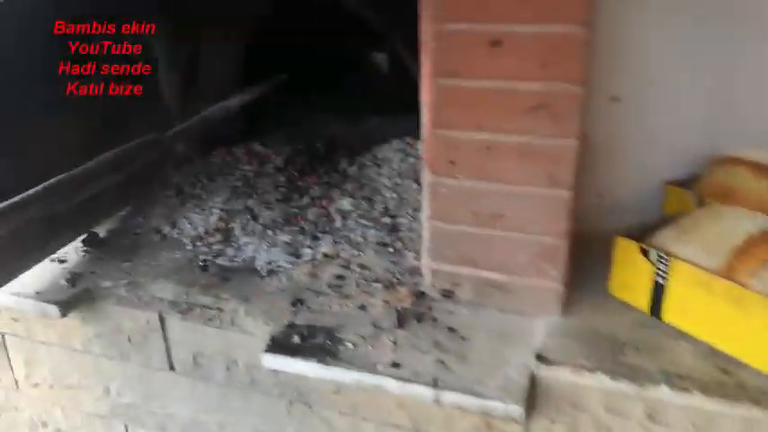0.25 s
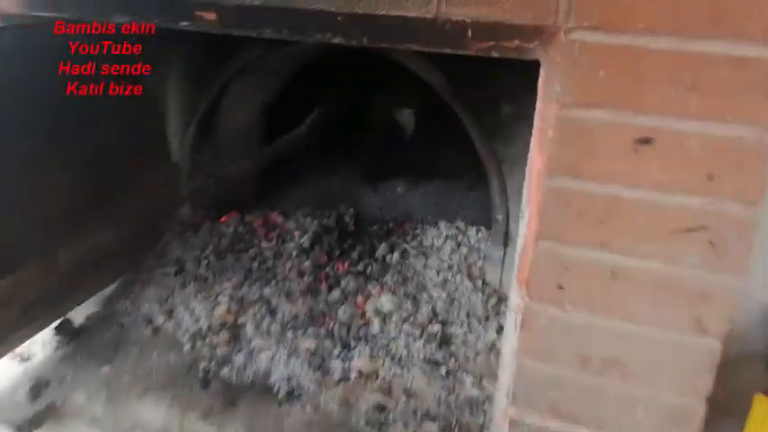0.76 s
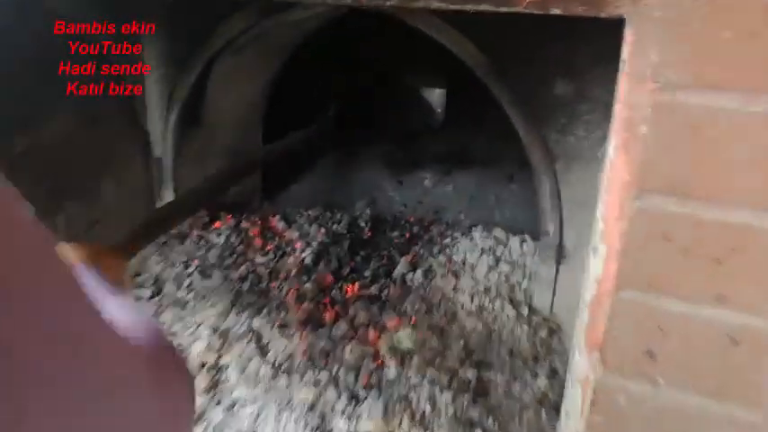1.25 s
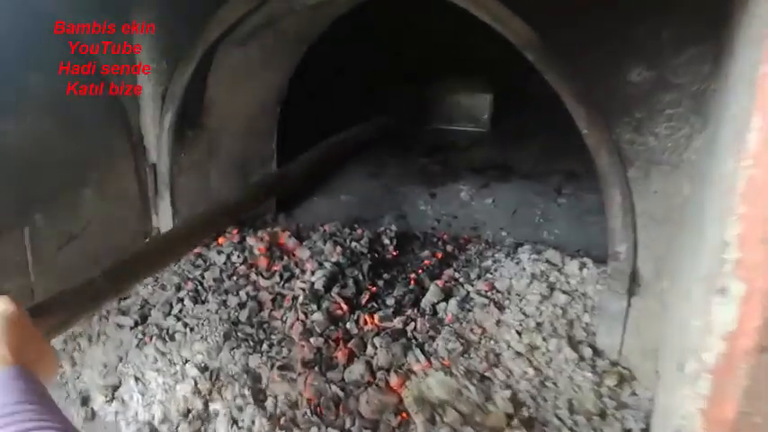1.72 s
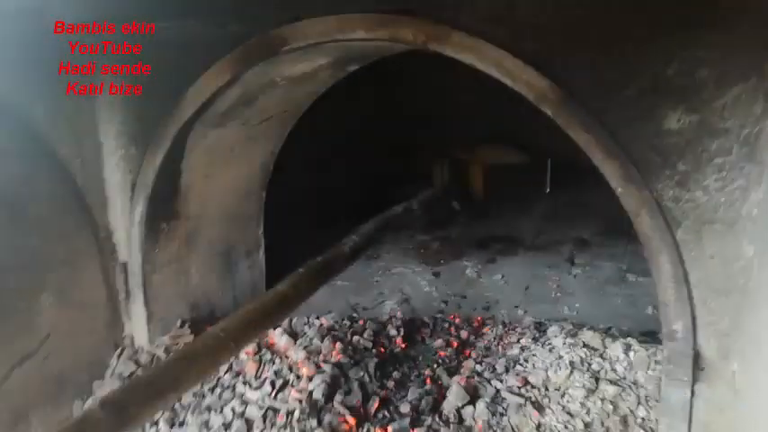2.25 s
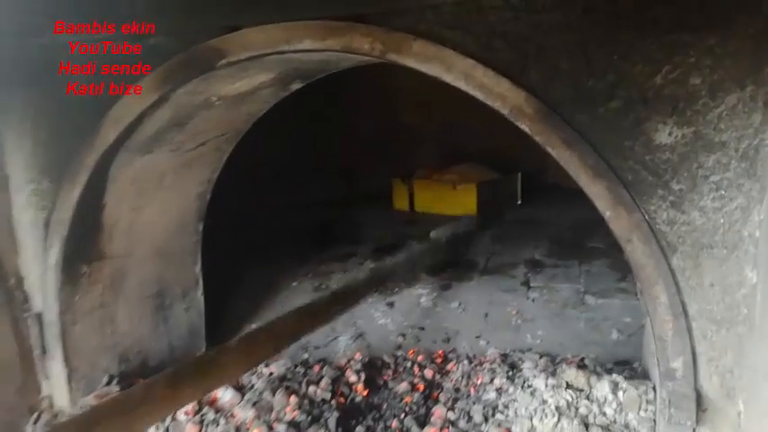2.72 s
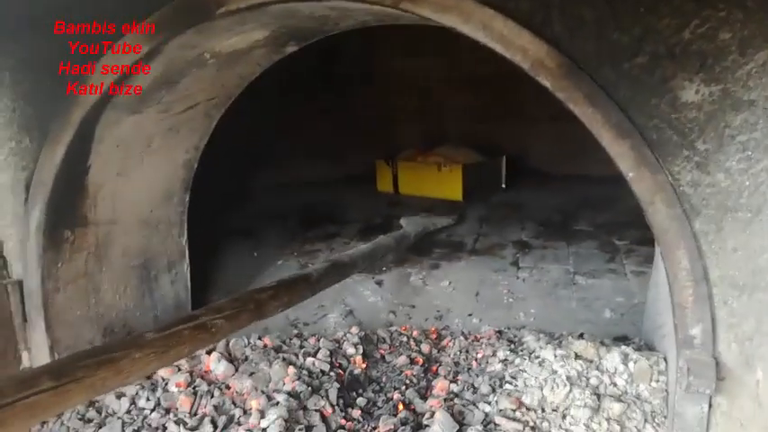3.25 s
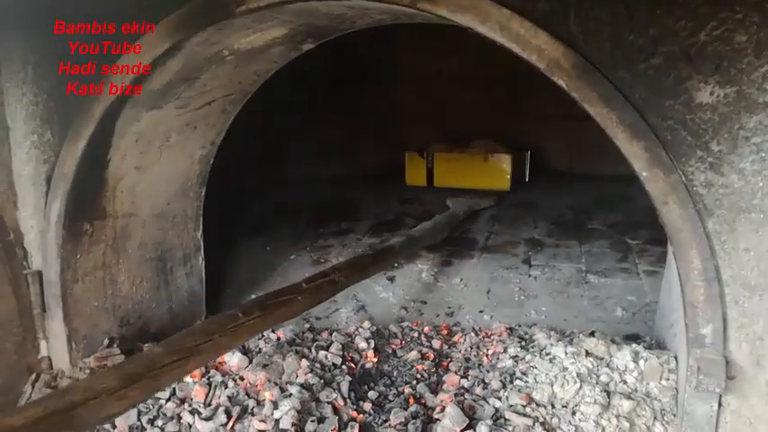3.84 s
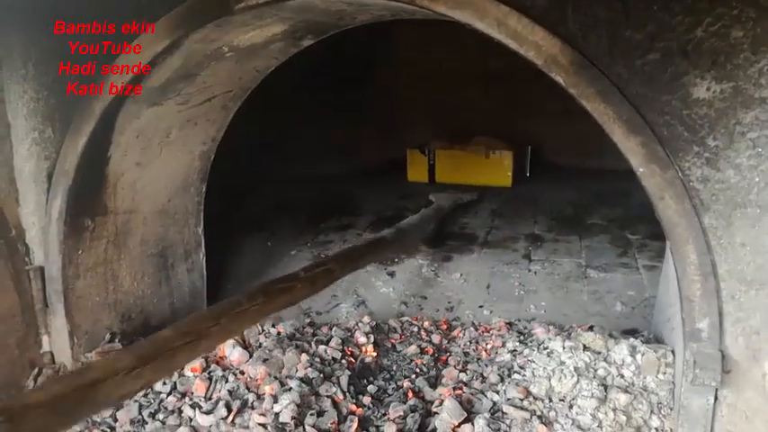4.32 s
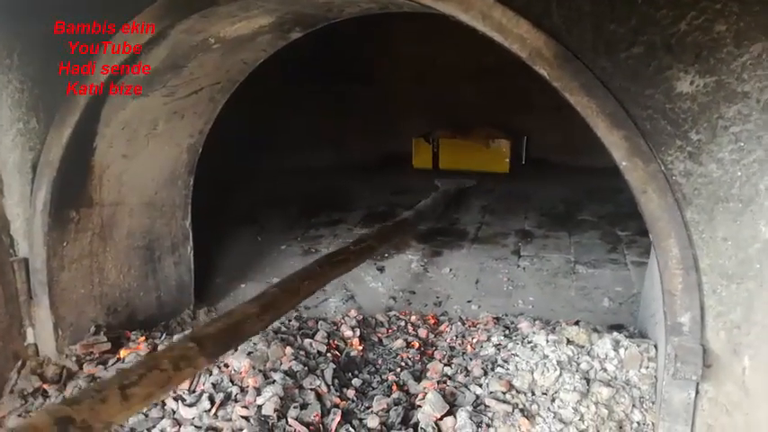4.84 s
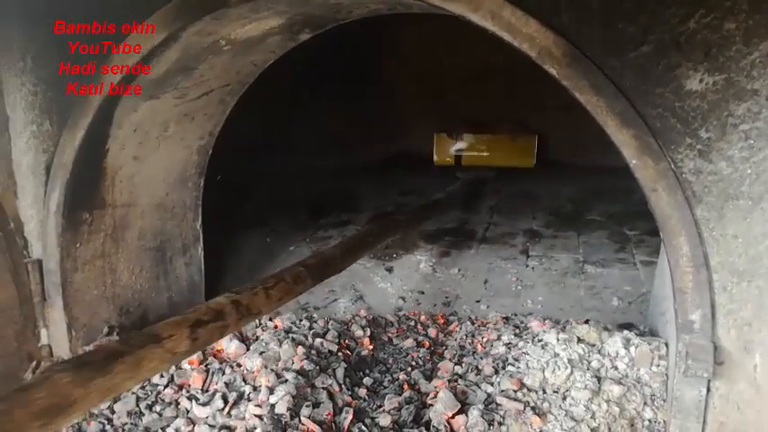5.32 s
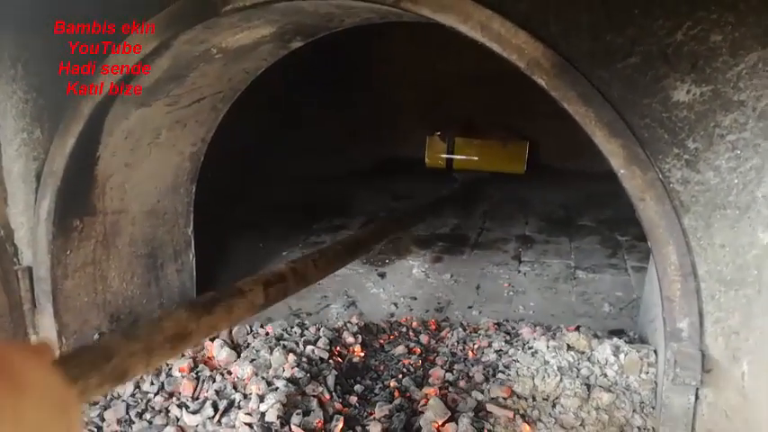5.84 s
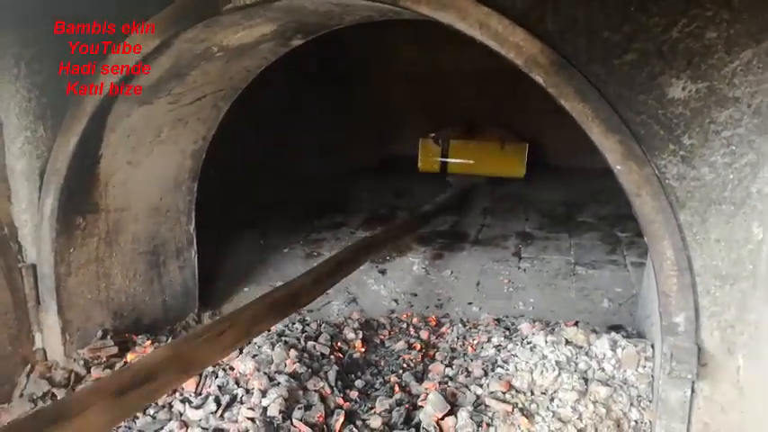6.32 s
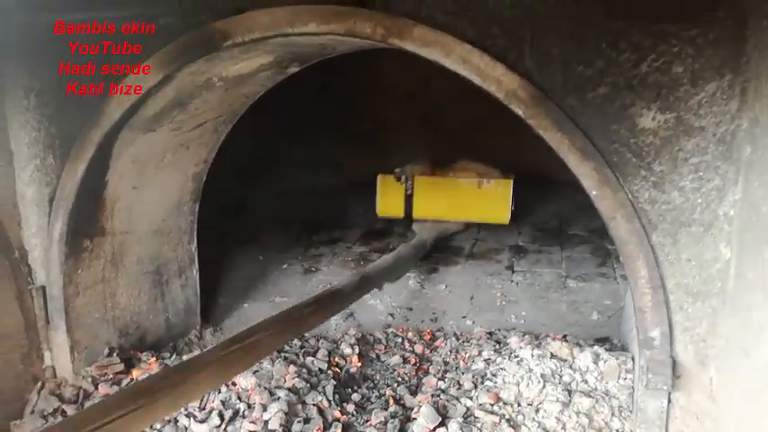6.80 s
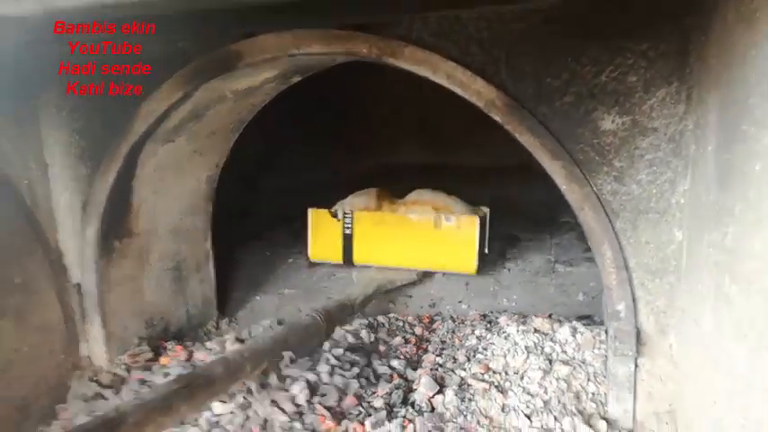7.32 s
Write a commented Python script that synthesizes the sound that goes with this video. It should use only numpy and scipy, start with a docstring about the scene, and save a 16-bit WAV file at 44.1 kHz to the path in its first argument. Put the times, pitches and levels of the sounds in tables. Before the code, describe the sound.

A metal baking tin catches and slips on an ashy oven floor, nudged by a long wooden pole. Sparse knocks lean left, then a hard metallic bang shakes the hearth, followed by busy knocking and grinding nearer the centre. A snapping ember bursts close to the left microphone late on. Short brick-vault echo, faint fire rumble and quiet outdoor air lie underneath.

```python
"""A long wooden peel drags and knocks a metal baking tin over the gritty floor of a brick oven, in stereo.
Scrape and knock forces, made of grainy noise, shake six bodies: handle, blade, the tin's base, rim and
walls, and loose grit. The brick vault answers the knocks briefly. One ember pops beside the left
microphone and a coal ticks, both shaped pulses. Behind lie filtered noises: the hush of a still yard,
the low rumble of the fire drawing air, and a hearth shudder after each knock."""
import sys
import numpy as np
from scipy import signal
from scipy.fft import rfft, irfft, next_fast_len
from scipy.io import wavfile
from scipy.ndimage import uniform_filter1d, map_coordinates

SR = 44100
rng = np.random.default_rng(int(sys.argv[2]) if len(sys.argv) > 2 else 0)


def digitize_waveform(pressure):
    """Quantize a signal to 16-bit integers and store it at the path in sys.argv[1].

    Rows of a 2-D input are taken as channels; values are limited to [-1, 1].
    """
    field = np.atleast_2d(pressure).T
    bounded = np.clip(field, -1, 1)
    quanta = np.round(bounded * 32767).astype(np.int16)
    wavfile.write(sys.argv[1], SR, quanta)


N = 333837  # samples


def amp(db):
    """Amplitude factor of a level in dB."""
    return 10 ** (np.asarray(db) / 20)


def unit(x):
    """x scaled to rms 1."""
    return x / np.sqrt(np.mean(x ** 2) + 1e-20)


def along(points, hz):
    """(frequency [Hz], value) points joined by straight lines on a log frequency axis."""
    f, v = np.transpose(points)
    return np.interp(np.log(hz + 1), np.log(f + 1), v)


def curves(rows):
    """One value per sample for each column after the time [s]."""
    s, *columns = np.transpose(rows)
    return np.array([np.interp(np.arange(N) / SR, s, column) for column in columns])


def wobble(rate):
    """A smooth random curve with rate knots a second."""
    knots = rng.standard_normal(int(N * rate / SR) + 4)
    return map_coordinates(knots, [np.arange(N) * rate / SR])


def filtered(x, response):
    """x times a complex response of frequency, padded so that ringing does not wrap round."""
    m = next_fast_len(N + SR // 2)
    return irfft(rfft(x, m) * response(np.fft.rfftfreq(m, 1 / SR)), m)[..., :N]


HUSH_DB = -65  # rms, before it reaches the microphone ports
# spectrum of the still yard: (frequency [Hz], relative level per Hz [dB])
YARD_SPECTRUM = [(12, -27), (20, 7), (59, -1.5), (86, -22.5), (98, -3), (118, -5), (224, -30), (390, -19.5),
                 (422, -14), (495, -30.5), (2930, -23), (7220, -39), (11300, -100), (14700, -90),
                 (22000, -120)]


def yard_hush():
    """Steady outdoor hush: noise shaped like the air of the still yard."""
    noise = rng.standard_normal((2, N))
    return amp(HUSH_DB) * unit(filtered(noise, lambda hz: amp(along(YARD_SPECTRUM, hz))))


# a knock shakes the hearth: level, growth per dB of the handle's level, time to fall 60 dB [s]
THUMP_DB, THUMP_PER_DB, THUMP_T60 = -30, 0.55, 0.4


def hearth_shudder():
    """Level of the low shudder: each knock starts one that dies exponentially."""
    since = np.arange(N) / SR - np.array(KNOCKS)[:, :1]
    start_db = [[THUMP_DB + THUMP_PER_DB * (db + handle)] for s, db, handle, *_ in KNOCKS]
    return np.sum((since > 0) * amp(start_db - 60 * abs(since) / THUMP_T60), axis=0)


# the fire's draw of air: (time [s], level [dB])
DRAUGHT = [(0.0, -66), (0.93, -74), (1.12, -66.5), (2.72, -61), (3.03, -67), (4.17, -56.5), (4.43, -57),
           (5.52, -57), (6.13, -67), (6.85, -59), (7.25, -66), (7.42, -77.5), (7.57, -76)]
# spectrum of draught and shudder: (frequency [Hz], relative level per Hz [dB])
RUMBLE_SPECTRUM = [(12, -11.5), (25, -3), (40, 0.5), (54, 6), (70, -12.5), (100, -23.5), (200, -120)]


def fire_and_hearth():
    """One low noise carries both the wavering draught of the fire and the hearth's shudder."""
    noise = rng.standard_normal((2, N))
    rumble = unit(filtered(noise, lambda hz: amp(along(RUMBLE_SPECTRUM, hz))))
    draught_level = amp(curves(DRAUGHT)[0]) * unit(amp(2.2 * wobble(11.0)))
    return (draught_level + hearth_shudder()) * rumble


POP_S = 6.4737


def ember_pop():
    """A steam pocket bursts in a coal: push, then slower suction; the far microphone hears it late and dull."""
    t = np.arange(SR // 50) / SR
    onset = 1 - np.exp(-(t / 0.00005) ** 2)
    swing = np.sin(np.pi * (t / 0.0007) ** 0.81) * onset
    near = np.zeros(N)
    near[round(POP_S * SR):][:len(t)] = 7.9 * swing * np.exp(-t / 0.00066)

    def to_far_microphone(hz):
        delay = np.exp(-2j * np.pi * hz * 0.00065)
        return 0.36 * delay / (1 + 1j * hz / 1300) ** 2

    def open_source(hz):
        # a small open source radiates no steady pressure
        return (1j * hz / (170 + 1j * hz)) ** 2

    far = filtered(near, to_far_microphone)
    return filtered(np.array([near, far]), open_source)


# a coal ticks: (time [s], level before the left-right tilt [dB], frequency [Hz])
TICKS = [(.7195, -36, 2000)]


def coal_tick():
    """A tiny tone pulse in a bell-shaped envelope, 5 dB stronger in the left microphone."""
    t = np.arange(SR // 50) / SR
    envelope = np.exp(-((t - 0.0011) / 0.00082) ** 2)
    tick = np.zeros(N)
    for s, db, hz in TICKS:
        tick[round(s * SR):][:len(t)] = amp(db) * np.sin(2 * np.pi * hz * t) * envelope
    return tick * amp([[2.5], [-2.5]])


# the vault's decay: (frequency [Hz], time to fall 60 dB [s])
VAULT = [(150, 0.28), (1000, 0.14), (4000, 0.11), (10000, 0.089)]


def vault(x):
    """The brick vault's answer: a noise tail in which each frequency dies at its own speed."""
    hz, t, z = signal.stft(rng.standard_normal((2, SR // 3)), SR, nperseg=256)
    decay = amp(-60 * t / along(VAULT, hz)[:, None])
    tail = signal.istft(z * decay, SR, nperseg=256)[1]
    return signal.fftconvolve(x, tail / np.linalg.norm(tail[0]), axes=1)[:, :N]


# likeness of the two ports before the bass is drawn together: (frequency [Hz], correlation)
ALIKE = [(100, .9995), (330, 0.49), (480, 0.59), (1000, 0.083), (2000, 0.067), (4000, 0.23), (9000, 0.043)]
# left behind right: (frequency [Hz], phase [radians])
LAG = [(0, -9), (350, 1.26), (600, 3.5), (1150, 6.5), (11000, 39)]
# left over right: (frequency [Hz], level [dB])
SHADE = [(350, 0), (650, -7.5), (1100, -3), (2000, -1), (3800, -7), (6000, -10.5), (11000, -9)]


def ports(pair):
    """Two unrelated sounds become left and right: alike in the bass, the left late and shaded by the hand."""
    side = np.array([[0.5], [-0.5]])

    def mix(hz):
        angle = np.arccos(along(ALIKE, hz)) / 2
        return np.array([np.cos(angle), np.sin(angle)])

    def lag_and_shade(hz):
        lag = np.interp(hz, *np.transpose(LAG))
        return np.exp(-1j * side * lag) * amp(side * along(SHADE, hz))

    common, apart = filtered(pair, mix)
    left, right = filtered(np.array([common + apart, common - apart]), lag_and_shade)
    # long waves press on both ports together
    bass_gap = filtered((left - right) / 2, lambda hz: 0.9 / (1 + (hz / 370) ** 8))
    return np.array([left - bass_gap, right + bass_gap])


def placed(stereo, pan_db):
    """A left-right tilt that spares the bass, which reaches both microphones alike."""
    bass = filtered(stereo, lambda hz: 1 / (1 + (hz / 420) ** 6))
    return bass + (stereo - bass) * amp(pan_db * [[0.5], [-0.5]])


def modes(table):
    """Causal response of a set of resonances of alternating sign, with its skirts steepened."""
    low, high = table[0][0] * 0.63, table[-1][0] * 2.1

    def response(f):
        ring = 0
        for k, (centre, width, db) in enumerate(table):
            resonance = 1j * f * width / (centre * centre - f * f + 1j * f * width)
            ring = ring + (-1) ** k * amp(db) * resonance
        skirts = (1j * f / (low + 1j * f) * high / (high + 1j * f)) ** 2
        return ring * skirts

    return response


BODIES = 6  # always in the order handle, blade, base, rim, walls, grit
# resonances of the peel's handle and blade: (frequency [Hz], width [Hz], relative level [dB])
HANDLE = [(91, 29, -8), (107, 15, -1.5), (157, 66, 1.5)]
BLADE = [(204.7, 36, 6), (277, 30, -4), (311, 31, -0.5), (382, 100, -9.5)]
# resonances of the tin's base, rim and walls: (frequency [Hz], width [Hz], relative level [dB])
BASE = [(474, 220, 2), (656, 65, 4), (758, 147, 1.5), (832, 76, -1.5)]
RIM = [(920, 150, -1.5), (1090, 84, 4.5), (1233, 45, 2), (1303, 22, 3), (1455, 370, -3)]
WALLS = [(1650, 130, -2.5), (1890, 130, 1.5), (2050, 55, 6.5), (2235, 98, 0.5), (2460, 110, -0.5),
         (2726, 190, 2), (2837, 306, 0.5), (3003, 99, 0), (3224, 39, -6), (3465, 77, -5.5),
         (3726, 97, -5.5), (4203, 340, -12)]
# spectrum of the loose grit: (frequency [Hz], relative level per Hz [dB])
GRIT = [(2060, -35), (3500, -9.5), (4430, -10.5), (5690, -9.5), (9040, -20.5), (9780, -23), (11100, -27.5),
        (11300, -50), (14700, -65), (22000, -120)]


def bodies(forces):
    """Six forces ring the six bodies; white force of rms 1 gives each body a sound of rms 1."""
    grid = np.linspace(0, SR / 2, num=20000)
    responses = [modes(table) for table in (HANDLE, BLADE, BASE, RIM, WALLS)]
    responses.append(lambda f: amp(along(GRIT, f)))
    total = 0
    for force, response in zip(forces, responses):
        gain = np.sqrt(np.mean(abs(response(grid)) ** 2))
        total = total + filtered(force, response) / gain
    return total


def gritty(spread_db):
    """Pairs of force noise whose samples vary in size like grains of ash and coal."""
    size = amp(spread_db * np.minimum(rng.exponential(size=N), 6))
    return unit(size * rng.standard_normal((BODIES, 2, N)))


RISE_S = 0.00041
# base level of a knock: dull woody knocks sound the base [dB, dB per dB of blade, dB per dB of grit]
BASE_DB, BASE_PER_WOOD, BASE_PER_GRIT = -20, 0.8, -0.58
# walls: a blow on the rim misses them [dB, dB per dB of rim, dB per dB of grit]
WALLS_DB, WALLS_PER_RIM, WALLS_PER_GRIT = -10.5, -0.4, 0.28
# the knocks: (time [s], reference level [dB], then over that level: handle [dB], blade [dB], grit [dB],
# rim [dB]; time for the rattle to fall 60 dB [s])
KNOCKS = [(0.215, -49.5, -30, -23, -6.5, -10, 0.33), (0.279, -29, -51, -39, -12.5, -17, 0.17),
          (0.34, -37, -25.5, -22, -14, -5, 0.039), (0.762, -50, -29, -12, -8.5, -13.5, 0.15),
          (0.978, -37.5, -32, -18, -23, -9, 0.2), (1.042, -26.5, -45, -17.5, -29.5, -13.5, 0.13),
          (1.199, -40.5, -24, -31, -13, -21, 0.11), (1.309, -35, -19, -13.5, -37.5, -17, 0.24),
          (1.545, -46, -24, -19, -27, -4, 0.32), (1.577, -23.5, -29, -19, -28.5, -8.5, 0.11),
          (1.627, -33, -16, -16, -24.5, -7.5, 0.12), (2.248, -37.5, -19, -15, -24, -3, 0.074),
          (2.395, -37.5, -20, -15, -29, -7.5, 0.11), (2.713, -5, -26.5, -31.5, -25, -16.5, 0.094),
          (2.783, -16, -32, -24.5, -19, -16, 0.045), (3.015, -40, -5.5, -29, -24, -15.5, 0.065),
          (3.334, -26.5, -19.5, -6, -24.5, -6.5, 0.12), (3.449, -39, -9, -12, -43.5, 2, 0.047),
          (3.904, -28, -10, -10.5, -24.5, -8, 0.082), (4.196, -28.5, -9.5, -14, -22.5, -9.5, 0.2),
          (4.356, -36.5, -29, -28, -21, -13, 0.097), (4.406, -29, -26, -33, -22, -9.5, 0.082),
          (4.529, -29, -26, -21, -17, -14.5, 0.31), (4.611, -37.5, -20, -9, -48.5, -1.5, 0.037),
          (4.748, -37, -31, -15, -18.5, -6, 0.15), (4.811, -43, -8, -2, -29, -5.5, 0.13),
          (4.963, -41.5, -27, -9.5, -27, -10, 0.15), (5.062, -21, -19, -12.5, -29.5, -5.5, 0.11),
          (5.213, -34, -12, -11, -47, -3.5, 0.064), (5.263, -37.5, -7.5, -4.5, -37, -2, 0.2),
          (5.596, -45.5, 4.5, 3, -20, -2, 0.061), (5.699, -20.5, -14.5, -20, -31, -11.5, 0.042),
          (5.897, -57, -22, -14.5, -22, -15, 0.09), (5.928, -28.5, -38, -23, -26, -18.5, 0.09),
          (6.7, -30, -39, -16, -24, -7.5, 0.16), (7.009, -35, -20.5, -17, -19, -10, 0.17),
          (7.284, -27.5, -17.5, -17, -27.5, -4, 0.092), (7.467, -26.5, -40, -30, -15.5, -14, 0.069)]
# the first contact over the rattle, one column a body: (level [dB], ...)
FIRST_CONTACT_DB = [30.9, 22.1, 28, 26.7, 26.84, 21.2]
# the knocks lean far left early on, then settle near the middle: (time [s], left over right [dB])
SWING = [(0, 0), (.8, 14), (1.6, 2), (3.4, 2), (7.5, -1.5)]


def knocks():
    """Each knock is a sharp first contact and a dying rattle of force on all bodies, answered by the vault."""
    level = np.zeros((BODIES, N + SR))
    first = np.zeros((BODIES, N))
    t = np.arange(SR // 2) / SR
    for s, db, handle, blade, grit, rim, t60 in KNOCKS:
        base = BASE_DB + BASE_PER_WOOD * blade + BASE_PER_GRIT * grit
        walls = WALLS_DB + WALLS_PER_RIM * rim + WALLS_PER_GRIT * grit
        size = amp(db + np.array([handle, blade, base, rim, walls, grit]))
        decay = amp(-60 * t / t60) + 0.13 * amp(-60 * t / 0.015)
        shape = (1 - np.exp(-t / RISE_S)) * decay
        level[:, round(s * SR):][:, :len(t)] += size[:, None] * shape
        first[:, round((s + RISE_S) * SR)] = size * amp(FIRST_CONTACT_DB)
    rattle = level[:, None, :N] * unit(amp(3.3 * wobble(250))) * gritty(spread_db=2.5)
    # the contact feeds only the first of the two sounds that the ports mix
    blows = bodies(rattle + first[:, None] * [[1], [0]])
    heard = ports(blows + amp(-4.5) * vault(blows))
    return placed(heard, curves(SWING)[0])


def slips(rate, t60):
    """Stick and slip: irregular releases of uneven size, rate a second, each a short dying burst."""
    release = (rng.random(N) < rate / SR) * amp(5.0 * rng.standard_normal(N))
    return unit(signal.lfilter([1], [1, -amp(-60 / (t60 * SR))], release))


def shifting(pair, depth_db):
    """The contact point wanders, so different resonances are favoured from moment to moment."""
    z = signal.stft(pair, nperseg=512)[2]
    field = uniform_filter1d(rng.standard_normal(z.shape[1:]), size=2, axis=0)
    field = uniform_filter1d(field, size=10, axis=1)
    return signal.istft(z * unit(amp(depth_db * unit(field))), nperseg=512)[1][:, :N]


USUAL_LOAD_DB, USUAL_BRIGHT_DB = -8, -11  # over the scrape
# the drag, one list a stroke: (time [s], scrape level [dB], load on the wooden peel [dB],
# brightness over the scrape [dB])
STROKES = [
    [(0.0, -61.5, -58, -11), (0.05, -67.5, -76, -9), (0.094, -64, -68, -12), (0.154, -73.5, -66, -23),
     (0.18, -67, -78, -10), (0.19, -69, -76, -17)],
    [(0.36, -50, -58, -5.5), (0.386, -59, -80, -9), (0.422, -58, -94, -3), (0.45, -58.5, -72, -4),
     (0.492, -79, -84, -6), (0.7, -83, -72, -33)],
    [(0.8, -68, -77, -11), (0.814, -64, -86, -18), (0.84, -70.5, -81, -2), (0.928, -60, -78, -3.5),
     (0.978, -52.5, -60, -9), (1.02, -42.5, -57.5, -14.5)],
    [(1.09, -53, -55, -4.5), (1.13, -50.5, -51, -9.5), (1.156, -48, -63, -7.5), (1.208, -49.5, -63, -8),
     (1.232, -56.5, -62, -11.5), (1.29, -54, -63, -10)],
    [(1.36, -50.5, -62, -6), (1.4, -54, -61, -8), (1.462, -62, -55.5, -17.5), (1.482, -60, -59, -39),
     (1.506, -77, -59, -17), (1.525, -63, -59.5, -18.5)],
    [(1.68, -56, -58.5, -10.5), (1.706, -54, -57, -7.5), (1.952, -48.5, -57.5, -10.5),
     (2.016, -57, -60, -6.5), (2.158, -42.5, -64, -10), (2.2, -43.5, -50, -9.5)],
    [(2.24, -45.5, -53, -10), (2.386, -49, -51.5, -10.5), (2.522, -63, -75, -8), (2.548, -83, -69, 0.5),
     (2.648, -65, -74, -1), (2.69, -61.5, -56, 2)],
    [(2.84, -50.5, -55.5, -11), (2.88, -44.5, -48.5, -17), (3.05, -53, -56, -23), (3.12, -74, -69.5, -13),
     (3.208, -48, -71.5, -17), (3.31, -55.5, -54, -1.5)],
    [(3.39, -48, -43.5, -10), (3.43, -53, -53.5, -10.5)],
    [(3.49, -48, -54, -10), (3.638, -56, -61, -8.5), (3.76, -79.5, -91, 6), (3.818, -77.5, -85, -4),
     (3.866, -57, -95.5, -16.5), (3.88, -48.5, -58, -16)],
    [(3.96, -49.5, -57, -27), (3.988, -58.5, -60, -23), (4.032, -62.5, -51.5, -34),
     (4.116, -69.5, -60, -10.5), (4.132, -62, -62, -14.5), (4.175, -61, -51, -24)],
    [(4.25, -58.5, -54.5, -7.5), (4.38, -47, -67, -4.5), (4.432, -45.5, -43.5, -6),
     (4.61, -39.5, -48, -8.5), (4.656, -59.5, -47.5, -8), (4.73, -63, -65, -6)],
    [(4.85, -62, -55, -40), (4.874, -61, -51, -23), (4.914, -57, -70.5, -14.5), (4.938, -55, -54, -12),
     (4.976, -51.5, -48, -5), (5.04, -46.5, -73, -7.5)],
    [(5.12, -47, -67.5, -15), (5.158, -56.5, -64, -14.5), (5.178, -55, -53.5, -16)],
    [(5.3, -47.5, -47, -21.5), (5.37, -51, -44.5, -19.5), (5.46, -71.5, -55.5, -20),
     (5.584, -62.5, -47.5, -10.5), (5.594, -52, -44, -24.5), (5.68, -43.5, -45, -6)],
    [(5.75, -55, -48, -11.5), (5.764, -71, -57, -27.5), (5.776, -96, -52.5, -27), (5.888, -96, -84.5, -17),
     (5.898, -55.5, -72, -24), (5.91, -58.5, -76, -30)],
    [(5.98, -59.5, -59, -10), (6.042, -67.5, -84, -14), (6.176, -52, -58.5, -12.5),
     (6.284, -51.5, -70, -12), (6.388, -46.5, -56.5, -10), (6.44, -51, -55, -8)],
    [(6.52, -50.5, -72, -8.5), (6.582, -53, -75, -12), (6.678, -45, -70, -17), (6.718, -41.5, -37.5, -12.5),
     (6.762, -44, -52.5, -14.5), (6.9, -43, -58, -9)],
    [(6.95, -41, -61, -15.5), (7.0, -43.5, -68, -12), (7.012, -43, -52, -11), (7.138, -43.5, -51.5, -9),
     (7.224, -50, -60.5, -6.5), (7.265, -51.5, -51, -1)],
    [(7.33, -50.5, -58, -13.5), (7.374, -57, -60, -7), (7.414, -64.5, -73, -4), (7.434, -69, -86, -5),
     (7.45, -57, -61, -7)],
    [(7.51, -54, -70, -9), (7.538, -48, -48, -18), (7.552, -58, -44.5, -10), (7.57, -53, -73, -8)],
]
# how each stroke grips, one row a stroke: (base on the floor [dB], rim over walls [dB], handle over blade [dB])
GRIP = [(-0.5, -3.5, 8), (0.5, 7.5, -1), (-5, 0, -15), (-5.5, 1.5, 2), (1.5, 3, 15), (-9, 3, 8),
        (0, 3.5, 4), (-16.5, -9, 7), (-6, 2.5, -7), (4.5, 3.5, -2), (3.5, -6.5, -6), (2, -0.5, -6.5),
        (3.5, 1.5, 1.5), (7, 4, 0), (2.5, 1, -3), (-6, -10, 0), (-2, -6, -7), (0, -1.5, -6), (-2.5, -6, 4),
        (4.5, -3, 6), (1.5, 1, -6.5)]
# how the bodies share a scrape at usual load and brightness, one column a body: (level [dB], ...)
SCRAPE_SHARE_DB = [-0.5, -2, -9.5, -1.5, -2.5, 1.5]
# response to load on the wood, one column a body: (change [dB per dB], ...)
SCRAPE_PER_LOAD = [1.04, 0.64, 0.32, 0.043, .01, .01]
# response to brightness, one column a body: (change [dB per dB], ...)
SCRAPE_PER_BRIGHT = [0.13, -0.29, 0.29, -0.061, 0.29, 1]


def drag():
    """The tin catches and slips over a steady grind; each body also wavers on its own."""
    rows = [(*point, *grip) for stroke, grip in zip(STROKES, GRIP) for point in stroke]
    level_db, load_db, bright_db, base, rim, handle = curves(rows)
    extra_load = load_db - level_db - USUAL_LOAD_DB
    extra_bright = np.clip(bright_db, -40, 5) - USUAL_BRIGHT_DB
    body_db = level_db + np.c_[SCRAPE_SHARE_DB]
    body_db = body_db + np.c_[SCRAPE_PER_LOAD] * extra_load
    body_db = body_db + np.c_[SCRAPE_PER_BRIGHT] * extra_bright
    body_db += [USUAL_LOAD_DB + handle / 2, USUAL_LOAD_DB - handle / 2,
                base, rim / 2, -rim / 2, np.full(N, USUAL_BRIGHT_DB)]
    contact = unit(1 + 0.2 * slips(rate=83, t60=0.015))
    own_waver = unit(amp([2.1 * wobble(35) + 1.24 * wobble(8) for _ in range(BODIES)]))
    envelope = amp(body_db) * contact * own_waver
    force = envelope[:, None] * gritty(spread_db=1.5)
    return shifting(bodies(force), depth_db=2.5)


def scene():
    """Peel and tin before the microphones, with the yard, fire and embers around them."""
    peel_knocks = knocks()
    through_ports = ports(drag() + yard_hush() + fire_and_hearth())
    return peel_knocks + through_ports + ember_pop() + coal_tick()


TOP_HZ = 11000


def record(dry):
    """The converter saturates softly near full scale and keeps nothing above its band limit."""
    clipped = dry / (1 + abs(dry / 0.93) ** 6) ** (1 / 6)
    # the edge is 500 Hz wide, centred on the limit
    return filtered(clipped, lambda hz: np.clip((TOP_HZ - hz) / 500 + 0.5, 0, 1) ** 2)


dry = scene()
out = record(dry)
digitize_waveform(out)
```